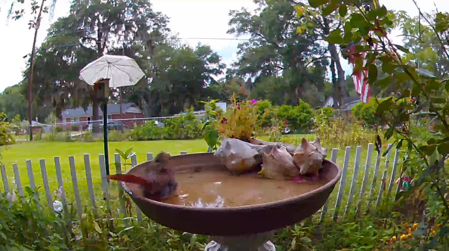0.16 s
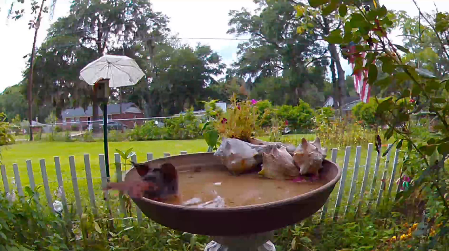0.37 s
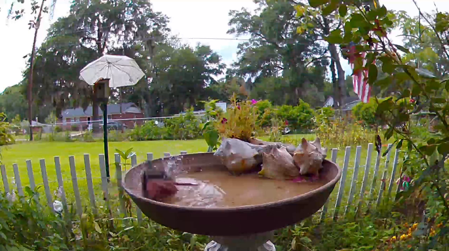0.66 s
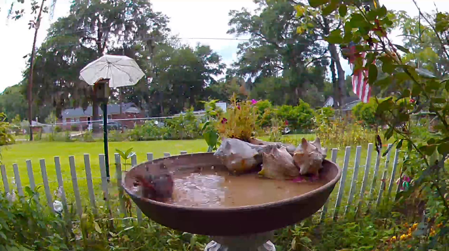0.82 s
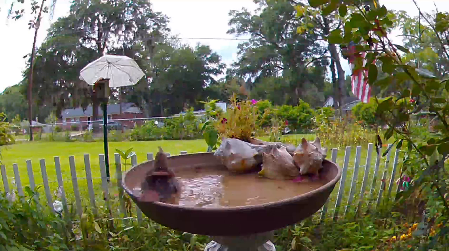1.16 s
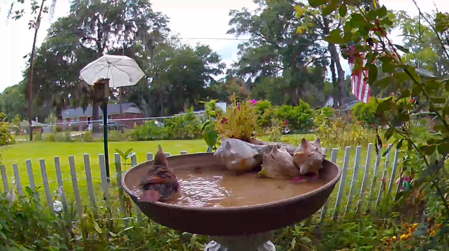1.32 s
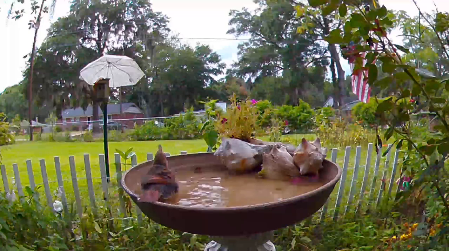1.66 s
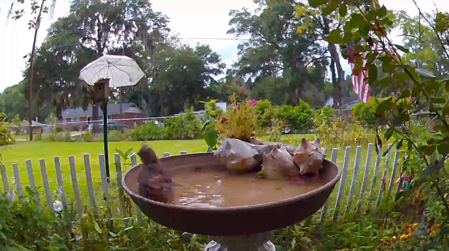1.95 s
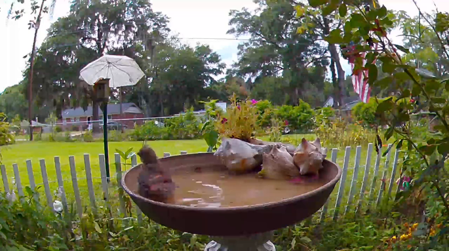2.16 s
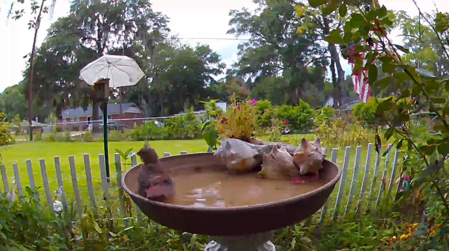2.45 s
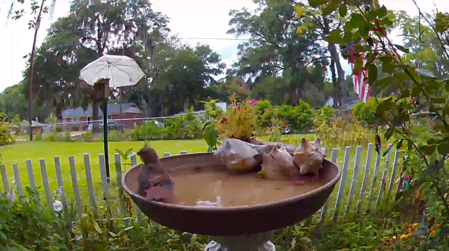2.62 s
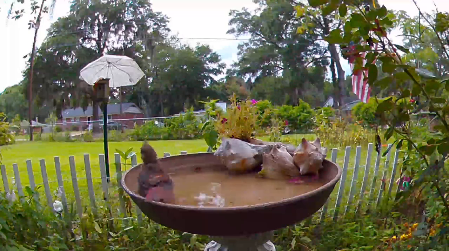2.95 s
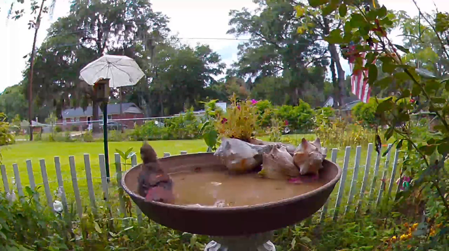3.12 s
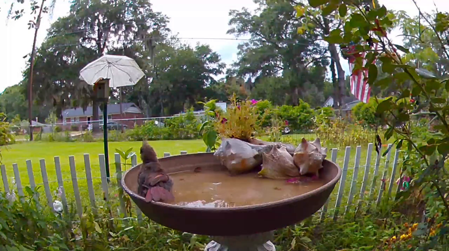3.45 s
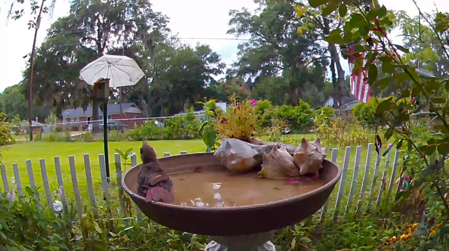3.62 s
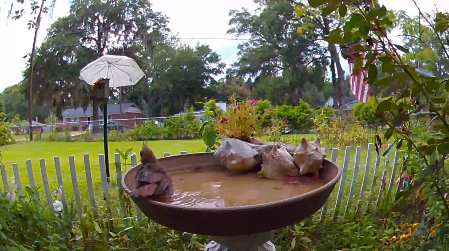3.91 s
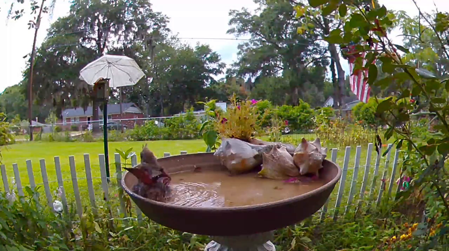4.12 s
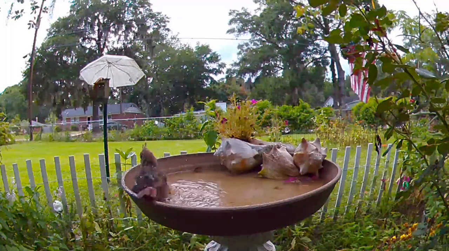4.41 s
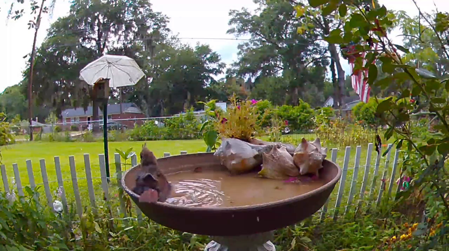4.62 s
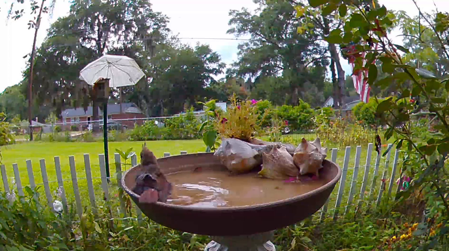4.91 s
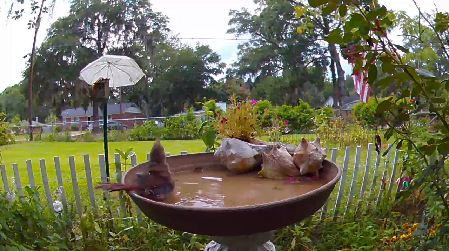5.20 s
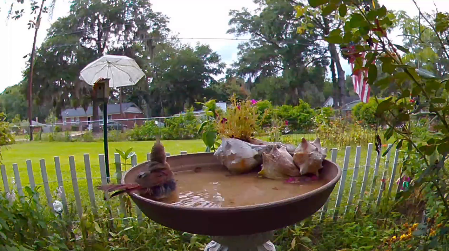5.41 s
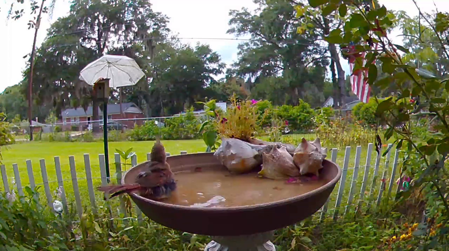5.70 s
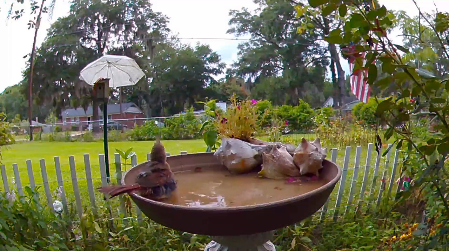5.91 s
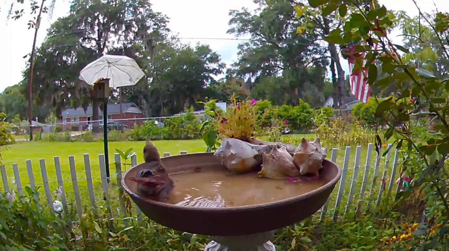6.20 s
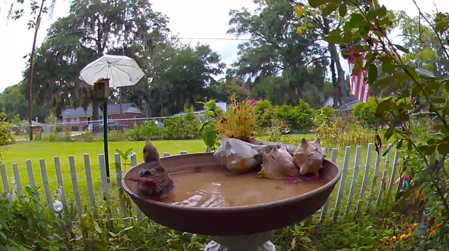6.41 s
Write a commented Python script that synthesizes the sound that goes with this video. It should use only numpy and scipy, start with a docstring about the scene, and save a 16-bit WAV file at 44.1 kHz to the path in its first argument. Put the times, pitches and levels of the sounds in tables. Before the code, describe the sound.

A small songbird bathes in a shallow bowl close to the microphone, in a quiet garden. From about 0.3 to 1 second its wings flick the water in quick, soft splashes, the first two strongest, with pattering spray and tiny plinking drops. At 1.5 seconds it gives one very short, high, rising chip, much louder than the water, overloading the microphone into a gritty click. After a lull, a gentler run of rapid flicks lasts from about 3.6 to 4.3 seconds, with a few drips until 4.7. A second sharp chip comes at 5 seconds, and one last small flick at 5.8. Throughout, insects sizzle faintly and very high over a soft outdoor hush and the low, wavering hum of an air conditioner. A distant insect buzz swells slightly around 2 to 3 seconds. Faint, thin calls of far birds come now and then, including near 6 seconds.

```python
"""Songbird bathing in a garden bowl

Close to the microphone a small songbird bathes in shallow water: two bouts of wing flicks throw spray
and drops. Twice it gives a sharp chip, a very fast two-voiced upward whistle that overloads the
microphone. Behind it insects sizzle in the summer garden, far birds call and an air conditioner hums."""
import sys
import numpy as np
from scipy import signal
from scipy.fft import rfft, irfft
from scipy.io import wavfile

SR = 44100
rng = np.random.default_rng(int(sys.argv[2]) if len(sys.argv) > 2 else 0)


def generate_wav(signal):
    """Clip the signal to [-1, 1] and save it as 16-bit WAV at the path in sys.argv[1]."""
    frames = np.transpose(np.atleast_2d(signal))
    scaled = np.clip(frames, -1, 1) * 32767
    pcm = np.round(scaled).astype(np.int16)
    wavfile.write(sys.argv[1], SR, pcm)


N = 289296
TIME = np.arange(N) / SR
CUTOFF_HZ = 9000  # top of the recorder's band

# wing flicks in the bowl, about nineteen a second in each bout:
# (time [s], relative peak [dB], relative treble [dB], decay time [s])
FLICKS = [(0.314, -32, -45, 0.0039), (0.364, -29, -48.5, 0.0039), (0.582, -47.5, -62, 0.0035),
          (0.644, -37.5, -40.5, 0.0031), (0.733, -46, -66, 0.0035), (0.776, -51, -56, 0.0031),
          (0.788, -40, -55, 0.0043), (0.841, -49.5, -55.5, 0.0042), (0.896, -45, -54, 0.0041),
          (0.954, -48.5, -65, 0.0035), (3.647, -51, -73, 0.0031), (3.798, -48, -67, 0.0035),
          (3.842, -45.5, -61, 0.0032), (3.855, -53, -62, 0.0049), (3.904, -50.5, -51, 0.0038),
          (3.953, -46.5, -55.5, 0.0035), (3.988, -47.5, -60, 0.0044), (4.037, -49, -59, 0.0035),
          (4.046, -43.5, -56, 0.0038), (4.097, -46.5, -59, 0.0044), (4.15, -47, -54.5, 0.0035),
          (4.19, -52.5, -60, 0.0029), (4.198, -50, -57, 0.0035), (4.251, -42.5, -58, 0.0043),
          (4.313, -43, -65, 0.0041), (4.607, -49, -70, 0.003), (5.845, -49.5, -60, 0.0038)]
# colour of a splash at close range: (frequency [Hz], relative level [dB])
SPLASH = [(200, -19.5), (600, -6), (850, -7), (1450, -7), (1980, 6), (2500, -2.5), (3100, 3), (4000, 4),
          (5200, -9), (7500, 6), (9000, -29.5)]


def from_db(db):
    """Decibels to gain."""
    return 10 ** (np.asarray(db) / 20)


def rms_of(x):
    """Root mean square."""
    return np.sqrt(np.mean(x ** 2))


def unit_power(x):
    """Scale to an rms of 1."""
    return x / (rms_of(x) + 1e-10)


def add(out, s, sound):
    """Mix a sound in at `s` seconds."""
    start = max(round(s * SR), 0)
    out[start:start + len(sound)] += sound[:N - start]


def envelope(t, attack, hold, release):
    """Straight rise, hold and fall, from time zero."""
    return np.clip(np.minimum(t / attack, 1 - (t - attack - hold) / release), 0, 1)


def sine(hz):
    """A sine wave that follows a changing pitch."""
    return np.sin(2 * np.pi * np.cumsum(hz) / SR)


def butterworth(x, hz, kind, order=2):
    """Low-, high- or band-pass filter."""
    return signal.sosfilt(signal.butter(order, hz, kind, fs=SR, output="sos"), x)


def coloured(x, spectrum):
    """Shape a signal by a band-limited spectrum; white noise keeps its power."""
    hz, db = np.transpose(spectrum)
    bins = np.maximum(np.fft.rfftfreq(len(x), 1 / SR), 1)
    gain = from_db(np.interp(np.log(bins), np.log(hz), db)) * (bins < CUTOFF_HZ + 1000)
    return irfft(rfft(x) * gain / rms_of(gain), len(x))


def drift(per_s):
    """A random wander of spread near 1, with `per_s` new values a second."""
    knots = rng.standard_normal(4000)
    return np.interp(TIME * per_s, np.arange(len(knots)), knots)


def droplet_impacts(per_s, spread_db):
    """Random impacts of uneven size, at unit power."""
    sizes = from_db(spread_db * np.minimum(rng.exponential(1, N), 3)) * rng.choice([-1, 1], N)
    return unit_power(sizes * (rng.random(N) < per_s / SR))


def garden_air(level_db=-66):
    """The faint, steady hush of the open garden."""
    # colour of the air: (frequency [Hz], relative density [dB])
    spectrum = [(20, 0.5), (40, 7), (90, 11.5), (160, 10), (250, 3), (500, 0.5), (1000, -2), (1650, -3),
                (1950, 2.5), (2450, -2), (3600, 0.5), (4250, 2), (4800, -4), (8200, -6), (9000, -42.5)]
    return from_db(level_db) * coloured(rng.standard_normal(N), spectrum)


def insects(sizzle_db=-1.5, pulse_db=-6, pulse_hz=108, ring_hz=8000, swell_db=-69.5, steady_db=-80):
    """A chorus blurs into a sizzle; one nearer insect pulses, and a lower buzz throbs far off."""
    # colour of the sizzle: (frequency [Hz], relative density [dB])
    sizzle = [(6200, -37.5), (6700, -4), (6920, -4), (7100, -0.5), (7400, -1.5), (7850, 7), (8100, -3.5),
              (8400, -23.5), (9000, -43)]
    # rise and fall of the chorus: (time [s], relative level [dB])
    chorus_levels = [(0.0, -63), (0.86, -63.5), (1.28, -64.5), (1.72, -61.5), (1.9, -65.5), (2.32, -66),
                     (2.7, -62), (4.93, -63.5), (5.3, -64), (6.56, -62.5)]
    chorus_gain = from_db(np.interp(TIME, *np.transpose(chorus_levels)))
    chorus = coloured(rng.standard_normal(N), sizzle) * from_db(sizzle_db + 0.8 * drift(30))
    cycle = np.cumsum(pulse_hz * (1 + 0.0094 * drift(6))) / SR % 1
    pulses = np.sin(np.pi * cycle) ** 4 * sine(ring_hz + 90 * drift(300))
    near = from_db(pulse_db) * unit_power(pulses * from_db(2.5 * drift(60)))
    rasp = butterworth(rng.standard_normal(N), [3800, 4400], "band")
    buzz = unit_power(rasp * from_db(2 * drift(30)))
    # the far insect winds its buzz up once and lets it run down
    swell = from_db(swell_db) * envelope(TIME - 1.74, attack=0.51, hold=0.2, release=0.6)
    return chorus_gain * (chorus + near) + np.hypot(swell, from_db(steady_db)) * buzz


def air_conditioner(compressor_hz=58, compressor_db=-65):
    """Motors at nearly the same speed beat, so the hum swells and sinks over weaker, wavering fan tones."""
    # motors beating with the compressor: (offset from it [Hz], level [dB], time in phase with it [s])
    motors = [(.545, -71.5, 2.79), (-3.14, -78.5, 4.42)]
    # tones of the fan: (frequency [Hz], level [dB])
    fan_tones = [(43, -80), (85, -76), (108, -83), (159, -84)]
    cycles = np.cumsum(compressor_hz + 0.55 * drift(2.6)) / SR
    hum = from_db(compressor_db) * np.sin(2 * np.pi * cycles)
    for beat_hz, db, in_phase_s in motors:
        hum += from_db(db) * np.sin(2 * np.pi * (cycles + beat_hz * (TIME - in_phase_s)))
    for hz, db in fan_tones:
        hum += from_db(db + 0.97 * drift(2.9)) * sine(hz + 2.3 * drift(8))
    return np.sqrt(2) * hum  # the levels are rms


def far_birds(waver=0.025):
    """Thin, unsteady slurs from distant trees."""
    # calls: (time [s], length [s], start pitch [Hz], end pitch [Hz], dry level [dB])
    calls = [(0.263, 0.047, 3950, 3370, -61), (.9, 0.021, 4350, 4180, -68), (4.033, .035, 7200, 5930, -65),
             (5.43, 0.063, 2150, 2270, -72), (2.5, 0.16, 3890, 3500, -79), (6.0, 0.055, 4050, 3310, -68),
             (6.0, 0.16, 4300, 4300, -77), (6.04, .022, 4400, 2960, -61)]
    out = np.zeros(N)
    wobble = 1 + waver * drift(460)
    for s, length, start_hz, end_hz, level_db in calls:
        n = int(length * SR)
        hz = np.linspace(start_hz, end_hz, n) * wobble[int(s * SR):][:n]
        add(out, s, from_db(level_db) * np.hanning(n) * sine(hz))
    return out


def wing_flicks(body_db=-6, treble_db=6.5, rise_s=0.0006, split_hz=5000,
                wash_db=-44, wash_s=0.0095, wash_lag_s=0.0018):
    """Each flick slaps the water: a burst of droplet impacts inside the softer wash of wet feathers."""
    body, treble = np.zeros(N), np.zeros(N)
    lead_s = 0.02
    t = np.arange(-lead_s, 2 * lead_s, 1 / SR)
    for s, peak_db, bright_db, decay_s in FLICKS:
        slap = np.exp(np.minimum((t - rise_s) / rise_s, (rise_s - t) / decay_s))
        # in decibels the wash varies only half as much as the slap
        wash = from_db(wash_db + peak_db / 2) * np.exp(-((t - wash_lag_s) / wash_s) ** 2 / 2)
        add(body, s - lead_s, np.hypot(from_db(peak_db + body_db) * slap, wash))
        add(treble, s - lead_s, np.hypot(from_db(bright_db + treble_db) * slap, wash))
    water = coloured(droplet_impacts(per_s=14000, spread_db=0.5), SPLASH)
    lows = butterworth(water, split_hz, "low", order=4)
    highs = butterworth(water, split_hz, "high", order=4)
    return body * lows + treble * highs


def spray(thrown_db=-37, follows_peak=0.82, flight_s=0.051, clump_db=3):
    """Each flick throws spray, more for a harder one; after a short flight it patters back in clumps."""
    falling_power = np.zeros(N)
    flights = np.arange(SR) / SR / flight_s
    shower = flights * np.exp(1 - flights)
    for s, peak_db, _, _ in FLICKS:
        add(falling_power, s, from_db(thrown_db + follows_peak * peak_db) ** 2 * shower)
    clumps = from_db(clump_db * drift(90))
    patter = coloured(droplet_impacts(per_s=1800, spread_db=5), SPLASH)
    return np.sqrt(falling_power) * clumps * patter


def drops(ring_db=1, rise_per_s=10, swell_s=0.00046, tick_s=0.0034):
    """A drop ticks on the surface, then its trapped bubble rings and rises slightly in pitch."""
    # drops in the bowl: (time [s], relative level [dB], pitch [Hz], t60 [s], tick offset [dB])
    bubbles = [(.385, -42, 4100, 0.022, -14), (.416, -42.5, 2180, 0.013, -5),
               (.435, -32.5, 4130, 0.011, -18), (0.457, -35, 3560, 0.014, -22),
               (0.47, -33.5, 2080, 0.011, -11), (0.669, -47, 3030, 0.021, -0.5),
               (1.037, -42.5, 1890, 0.014, -11.5), (4.442, -43.5, 2090, 0.011, -5.5),
               (4.6499, -33, 2300, 0.0073, -19.5), (4.6506, -38, 3400, 0.0081, -13),
               (4.716, -46, 2340, 0.026, -2.5)]
    rings, ticks = np.zeros(N), np.zeros(N)
    t = np.arange(int(0.05 * SR)) / SR
    for s, level_db, hz, t60, tick_db in bubbles:
        phase = 2 * np.pi * hz * (t + rise_per_s * t ** 2 / 2)
        onset = 1 - np.exp(-t / swell_s)
        add(rings, s, from_db(level_db - 60 * t / t60) * onset * np.sin(phase))
        add(ticks, s, from_db(level_db + tick_db) * onset * np.exp(-t / tick_s))
    return from_db(ring_db) * rings + ticks * coloured(rng.standard_normal(N), SPLASH)


def chips(start_hz=5030, top_hz=8280, glide_s=0.0068, edge_s=0.0013, lower_voice_db=-8.5):
    """Both sides of the voice box whistle the same upward sweep, a little apart in pitch, and beat."""
    # calls at the microphone: (time [s], length [s], dry level [dB], gap between the voices [Hz])
    calls = [(1.5299, .014, -12.5, 415), (4.9645, .0185, -10.5, 381.3)]
    out = np.zeros(N)
    for s, length, level_db, gap_hz in calls:
        t = np.arange(int(length * SR)) / SR
        hz = top_hz - (top_hz - start_hz) * np.exp(-t / glide_s)
        voices = sine(hz) + from_db(lower_voice_db) * sine(hz - gap_hz)
        swell = np.interp(t / length, [0, 0.477, 1], [0.24, 1, 0.48])
        edges = envelope(t, edge_s, length - 2 * edge_s, edge_s)
        add(out, s, from_db(level_db) * swell * edges * voices)
    return out


def garden_scatter(x, wet_db):
    """Nearby leaves scatter the sound at once; fence and trees send back a faint longer tail."""
    # returns to the microphone: (delay [s], relative level per millisecond [dB])
    returns = [(.007, -32), (0.01, -19.5), (.02, -26.5), (.03, -36), (.045, -42.5), (.075, -57.5),
               (.092, -52), (.11, -61), (.22, -65), (.5, -73.5)]
    delay, db = np.transpose(returns)
    t = np.arange(SR // 2) / SR
    decay = from_db(np.interp(t, delay, db)) * (t > delay[0])
    response = rng.standard_normal(len(t)) * decay / np.sqrt(SR / 1000)
    return x + from_db(wet_db) * signal.fftconvolve(x, response)[:N]


def microphone_overload(x, limit_db=-19, knee_db=0.72, shift_db=-26, shift_hz=1250,
                        coupling_hz=120, crackle_db=-41):
    """Strong treble overloads the microphone and shifts its bias: a gritty knock on each beat of a chip."""
    treble_level = np.abs(signal.hilbert(butterworth(x, CUTOFF_HZ, "high")))
    excess_db = 20 * np.log10(treble_level + 1e-9) - limit_db
    overloaded = (1 + np.tanh(excess_db / knee_db)) / 2
    bias = butterworth(overloaded, shift_hz, "low", order=1)
    knock = from_db(shift_db) * butterworth(bias, coupling_hz, "high", order=1)
    crackle = from_db(crackle_db) * overloaded * rng.standard_normal(N)
    return x + knock + crackle


def mirror_image(x, sampling_hz=16000):
    """The recorder's coarse sampling mirrors the top treble upward."""
    # strength of the image: (frequency [Hz], gain [dB])
    image_gains = [(7800, -66), (8050, -5.5), (8300, -10.5), (8550, -16.5), (8750, -23.5), (9200, -47.5),
                   (9600, -100)]
    gain = from_db(np.interp(np.fft.rfftfreq(N, 1 / SR), *np.transpose(image_gains)))
    mirrored = x * 2 * np.cos(2 * np.pi * sampling_hz * TIME)
    return irfft(rfft(mirrored) * gain, N)


def scene():
    """One microphone close to the bowl, with the garden behind it."""
    calls = garden_scatter(chips(), wet_db=-0.6)
    bath = garden_scatter(wing_flicks() + drops() + spray(), wet_db=-3.5)
    air = garden_air()
    distant = garden_scatter(far_birds(), wet_db=16)
    return (calls + bath + distant + air + insects() + air_conditioner())[None]


def record(dry):
    """The microphone overloads; the recorder mirrors the top treble and cuts steeply above its band."""
    x = microphone_overload(dry)
    low_pass = signal.ellip(10, 0.2, 80, CUTOFF_HZ, fs=SR, output="sos")
    return signal.sosfilt(low_pass, x + mirror_image(x))


dry = scene()
out = record(dry)
generate_wav(out)
```